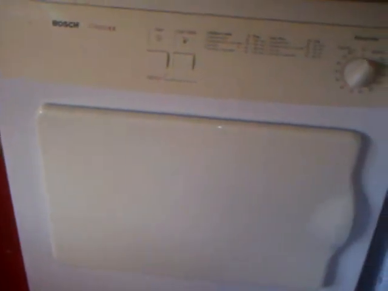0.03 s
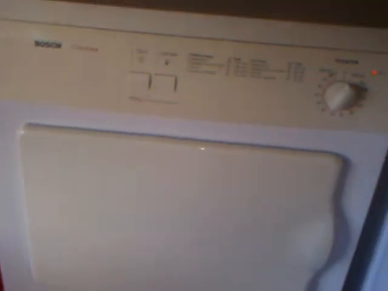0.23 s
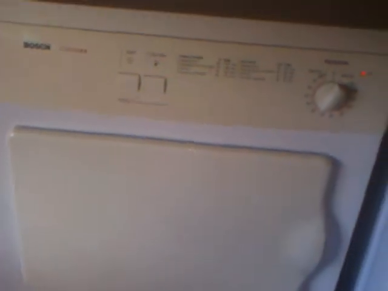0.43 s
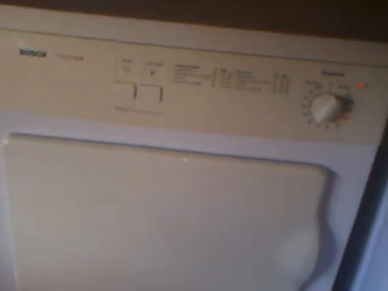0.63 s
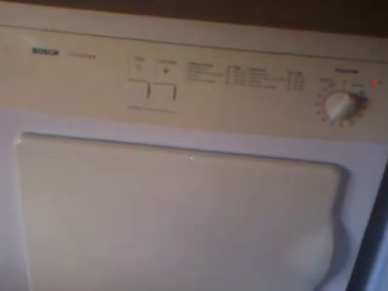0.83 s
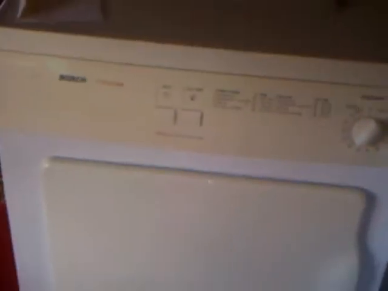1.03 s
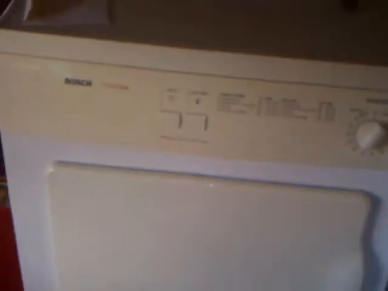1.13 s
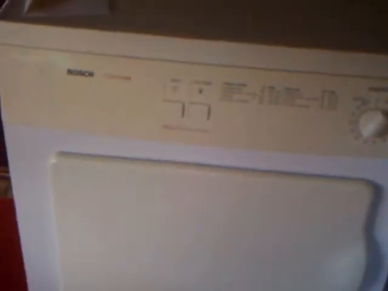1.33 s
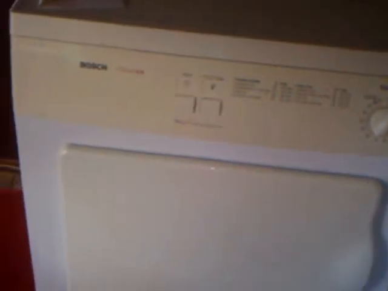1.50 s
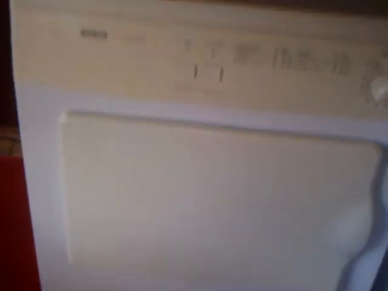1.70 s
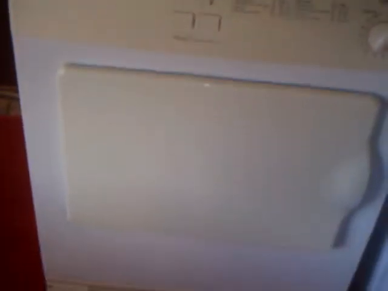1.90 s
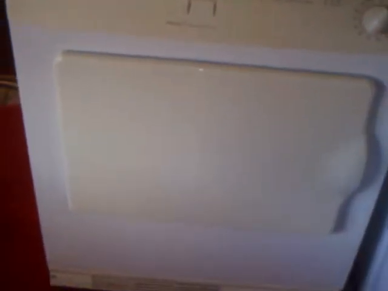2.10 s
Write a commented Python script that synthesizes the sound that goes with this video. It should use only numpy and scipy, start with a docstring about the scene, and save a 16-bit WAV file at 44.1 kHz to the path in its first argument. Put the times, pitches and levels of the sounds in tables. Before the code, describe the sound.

A tumble dryer hums and rumbles low, with sharp plastic handling clicks close by.

```python
"""A tumble dryer hums in a small room: wavering motor and fan tones over the low rumble of the drum,
with a few soft drops of laundry. Up close, fingers rub and click on the plastic case of a hand-held
camera: each contact rings the case, skin drags grainily, one finger slips with a squeak, and the grip
shifts with a dull bump. The recorder is narrow-band and overloads on the sharpest clicks."""
import sys
import numpy as np
from scipy import signal
from scipy.fft import rfft, irfft
from scipy.io import wavfile
from scipy.ndimage import uniform_filter1d

SR = 44100
rng = np.random.default_rng(int(sys.argv[2]) if len(sys.argv) > 2 else 0)


def wrap_up_sound(samples):
    """Save the sound to the file named by the first command line argument, as 16-bit audio."""
    columns = np.atleast_2d(samples).T
    # keep every value between -1 and 1, then stretch to whole-number steps
    tamed = np.clip(columns, -1, 1)
    steps = np.round(tamed * 32767).astype(np.int16)
    wavfile.write(sys.argv[1], SR, steps)


N = 94815
FOCUS_OCT = 0.23  # width of the band that a contact favours
GRAIN_DB, GRAIN_PER_S = 1, 300  # roughness of skin on plastic


def undb(db):
    """Decibels to gain."""
    return 10 ** (np.asarray(db) / 20)


def walk(per_s):
    """Smooth random drift with a spread of 1."""
    hold = max(int(SR / per_s), 2)
    steps = rng.standard_normal(4096)[(np.arange(N) // hold) % 4096]
    drift = uniform_filter1d(uniform_filter1d(steps, hold), hold // 2)
    return (drift - drift.mean()) / drift.std()


def focus(hz, centre_hz):
    """A narrow bell of height 1 around one frequency."""
    return np.exp(-(np.log2(hz / centre_hz) / FOCUS_OCT) ** 2)


def noise(colour, focus_hz=1000, focus_db=0):
    """Noise of rms 1, coloured by (Hz, dB) points and an optional narrow boost."""
    hz, db = np.array(colour).T
    bins_hz = np.maximum(np.fft.rfftfreq(N, 1 / SR), 1)
    shape_db = np.interp(np.log(bins_hz), np.log(hz), db) + focus_db * focus(bins_hz, focus_hz)
    coloured = irfft(rfft(rng.standard_normal(N)) * undb(shape_db), N)
    return coloured / coloured.std()


def swells(t, rows):
    """An envelope of bell-shaped rises from (centre s, dB, half length s) rows."""
    return np.sqrt(sum(undb(db) ** 2 * np.exp(-((t - at) / half) ** 2) for at, db, half in rows))


def dryer():
    """Motor, fan and drum tones waver with the load over the rumble of drum and air."""
    # The hum. Each row: pitch in Hz, level in dB, level wobble in dB.
    tones = [(24.9, -46.5, 4.5), (71.98, -47.5, 4), (99.1, -47, -1), (124.3, -55.5, 5), (147.8, -52, 4.5),
             (221.9, -54, -0.5), (299.8, -42, 2.5), (349.9, -52, 0), (474.5, -44.5, 1.5), (494.4, -48.5, 2)]
    # Rumble of drum and air. Each row: frequency in Hz, relative level in dB.
    rumble_colour = [(15, 3), (42, -9.5), (75, -5.5), (160, -5.5), (250, -9.5), (310, -2.5), (420, -5),
                     (520, -9.5), (700, -9.5), (1000, -22.5), (1800, -30), (2800, -28.5), (4200, -34),
                     (5600, -35)]
    waver_hz, rumble_db, tumble_db = 1.0, -40, 1
    hum = 0
    for hz, db, wobble_db in tones:
        turns = np.cumsum(hz + waver_hz * walk(per_s=8.97)) / SR + rng.random()
        throb = undb(db + wobble_db * walk(per_s=16))
        hum += np.sqrt(2) * throb * np.sin(2 * np.pi * turns)
    return hum + noise(rumble_colour) * undb(rumble_db + tumble_db * walk(per_s=10.28))


def hand_rubs(t):
    """Skin slides over plastic with a soft, grainy hiss and rumbles through the case."""
    # The slides. Each row: centre in seconds, level in dB, half length in seconds, favoured Hz.
    rubs = [(0.02, -46.5, 0.037, 900), (0.581, -53.5, .014, 2660), (1.516, -45, 0.02, 2350),
            (1.622, -49, 0.16, 3000), (1.634, -42, .032, 3000), (1.771, -45, 0.049, 3800),
            (1.873, -52.5, 0.08, 1300), (2.104, -48, 0.025, 850)]
    # Friction hiss. Each row: frequency in Hz, relative level in dB.
    hiss_colour = [(300, -14.5), (900, 5.5), (1300, -2), (1800, -5.5), (2400, -2), (3000, -5.5),
                   (3500, -9.5), (4100, -5), (5500, -13)]
    # Rumble through the case. Each row: frequency in Hz, relative level in dB.
    grip_colour = [(35, -9.5), (70, -1.5), (150, -11.5), (300, -23.5), (1000, -45)]
    grip = undb(4) * noise(grip_colour)
    out = np.zeros(N)
    for at, db, half, focus_hz in rubs:
        hiss = noise(hiss_colour, focus_hz, focus_db=6.5)
        out += swells(t, [(at, db, half)]) * (hiss + grip)
    return out * undb(GRAIN_DB * walk(GRAIN_PER_S))


def case_clicks(t):
    """Each contact cracks and rings the case in its own balance of modes; the room answers faintly."""
    # Modes of the plastic case. Each row: frequency in Hz, level in dB, seconds to fall 60 dB.
    modes = [(194.5, -32.5, 0.067), (545.6, -13, 0.017), (825.6, -10.5, 0.045), (1072, -13, 0.026),
             (1259, -9.5, 0.02), (1560, -10, .017), (1952, -4.5, 0.012), (2272, -15.5, 0.023),
             (2687, -12, 0.0093), (3130, -28, 0.024), (3507, -17.5, 0.013), (4046, -19.5, 0.012),
             (4853, -19, 0.0066)]
    # Finger contacts. Each row: start in seconds, gain in dB, tilt in dB per octave, favoured Hz.
    contacts = [(0.207, 0, 3, 4840), (0.2083, -8, 5.5, 1510), (0.2822, -33.5, 2.5, 1100),
                (0.3333, -24, -3, 1630), (0.3871, -16, -10, 876), (0.3893, 1.5, -4, 724),
                (0.6345, -12.5, -1.5, 1680), (0.6417, -14.5, 6.5, 2045), (0.6430, 0.5, 2.5, 1430),
                (0.6450, -10.5, 6, 1144), (0.6472, -14.5, -3.5, 2521), (0.8327, -38.5, -5, 1300),
                (0.8853, -31, 0.5, 1246), (2.0802, -39.5, -8, 838)]
    # The crack of the attack. Each row: frequency in Hz, relative level in dB.
    crack_colour = [(200, -27.5), (600, 17.5), (2200, -14.5), (5500, -5)]
    crack_db, crack_decay_s = -21, 0.00098
    focus_db, pivot_hz, contact_s = 8.5, 1730, 0.00033
    room_db, room_t60_s = -26, 0.15
    out, crack = np.zeros(N), noise(crack_colour)
    for at, db, tilt_db, focus_hz in contacts:
        live = (t >= at) & (t < at + 0.2)
        age = t[live] - at
        out[live] += undb(db + crack_db) * crack[live] * np.exp(-age / crack_decay_s)
        attack = 1 - np.exp(-age / contact_s)
        for k, (hz, mode_db, t60) in enumerate(modes):
            colour_db = tilt_db * np.log2(hz / pivot_hz) + focus_db * focus(hz, focus_hz)
            ring = np.sin(2 * np.pi * hz * age) * undb(-60 * age / t60)
            out[live] += (-1) ** k * undb(db + mode_db + colour_db) * ring * attack
    room = rng.standard_normal(N) * undb(-60 * t / room_t60_s)
    return out + undb(room_db) * signal.fftconvolve(out, room / np.linalg.norm(room))[:N]


def finger_slip(t):
    """A finger slips off the case: a short, grainy scuff that starts with a squeak."""
    # The scuff. Each row: frequency in Hz, relative level in dB.
    scuff_colour = [(100, -10), (400, -1), (900, 5.5), (1150, -5.5), (1750, -9.5), (2600, -8), (3100, -18),
                    (3900, -18.5), (5500, -32)]
    start_s, attack_s, hold_s, decay_s = 0.4392, 0.0055, 0.021, 0.036
    squeak_hz, jitter, squeak_decay_s = 2620, 0.02, 0.015
    age = np.maximum(t - start_s, 0)
    envelope = np.minimum(age / attack_s, 1) * np.exp(-np.maximum(age - hold_s, 0) / decay_s)
    scuff = envelope * noise(scuff_colour) * undb(GRAIN_DB * walk(GRAIN_PER_S))
    turns = np.cumsum(squeak_hz * (1 + jitter * walk(GRAIN_PER_S))) / SR
    squeak = (age > 0) * np.exp(-age / squeak_decay_s) * np.sin(2 * np.pi * turns)
    return undb(-24.5) * scuff + undb(-29.5) * squeak


def laundry_drops(t):
    """Laundry falls in the drum with soft thuds."""
    # The landings. Each row: centre in seconds, level in dB, half length in seconds.
    drops = [(0.883, -41.5, 0.033), (1.412, -40, 0.036), (2.011, -35, 0.025), (2.107, -38.5, 0.032)]
    # The thud. Each row: frequency in Hz, relative level in dB.
    thud_colour = [(60, -17), (160, 4), (400, -4.5), (700, -2), (1100, -27.5), (2500, -27.5), (5500, -44)]
    return noise(thud_colour) * swells(t, drops)


def camera_bump(t):
    """The grip shifts and bumps the camera: one dull knock of low, damped tones."""
    # Tones of the bump. Each row: start in seconds, pitch in Hz, level in dB, decay in seconds.
    tones = [(1.775, 85.3, -21.5, 0.035), (1.785, 13.5, -16.5, 0.072)]
    rise_s = 0.0076
    out = np.zeros(N)
    for at, hz, db, decay_s in tones:
        age = np.maximum(t - at, 0)
        envelope = (1 - np.exp(-age / rise_s)) * np.exp(-age / decay_s)
        out += undb(db) * envelope * np.sin(2 * np.pi * hz * age)
    return out


def scene():
    """The dryer with the handling sounds in front of it, in mono."""
    t = np.arange(N) / SR
    mix = dryer() + hand_rubs(t) + case_clicks(t) + finger_slip(t) + laundry_drops(t) + camera_bump(t)
    return mix[None]


def record(dry):
    """A narrow-band recorder: the input overloads, and its filter's overshoot is clipped again."""
    band_hz, top_hz, input_limit, output_limit = 5800, 16000, 0.65, 0.71
    band_filter = signal.cheby2(14, 80, band_hz * 8 / 7, fs=SR, output="sos")
    top_filter = signal.ellip(8, 0.2, 70, top_hz, fs=SR, output="sos")
    narrow = signal.sosfilt(band_filter, np.clip(dry, -input_limit, input_limit))
    return signal.sosfilt(top_filter, np.clip(narrow, -output_limit, output_limit))


dry = scene()
out = record(dry)
wrap_up_sound(out)
```